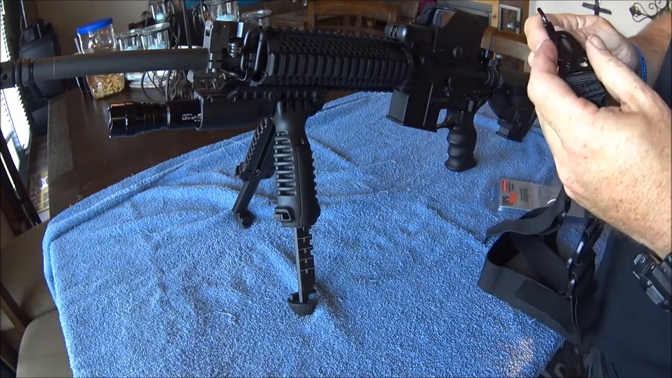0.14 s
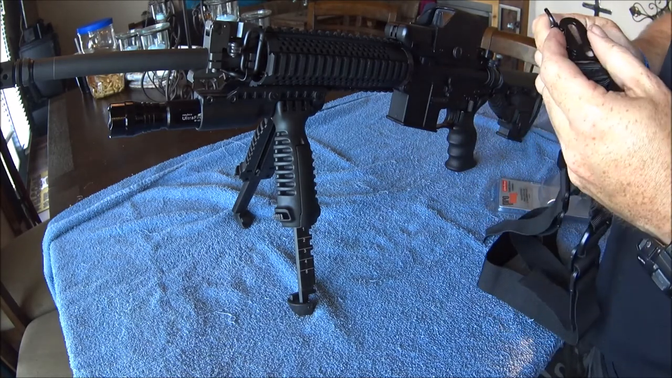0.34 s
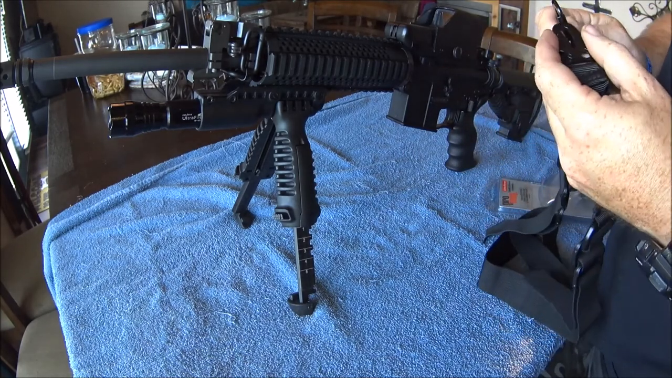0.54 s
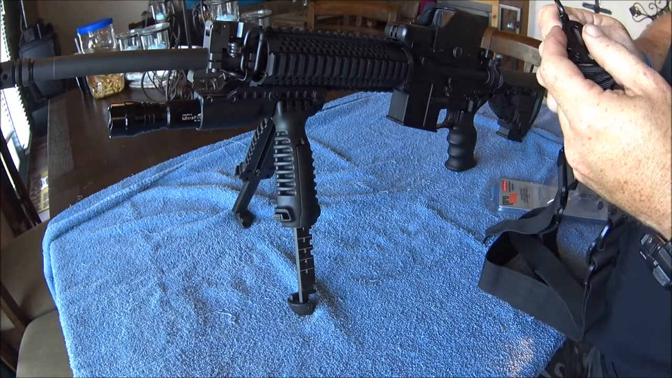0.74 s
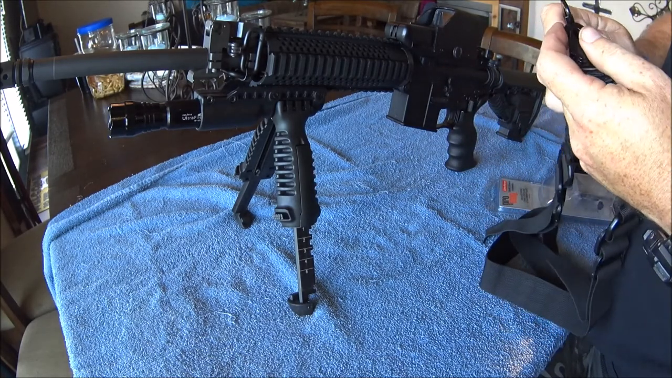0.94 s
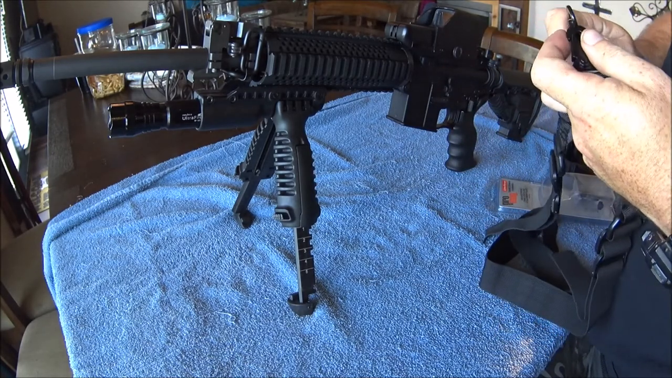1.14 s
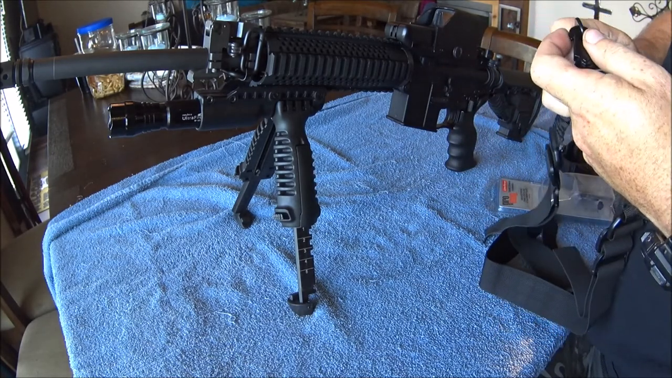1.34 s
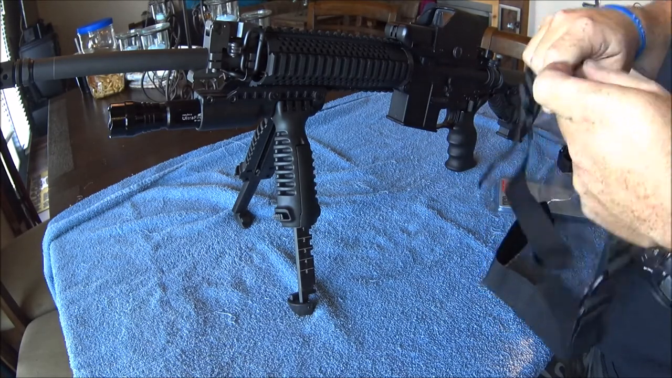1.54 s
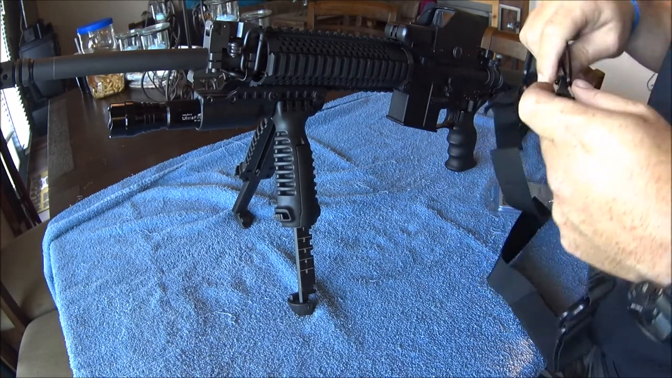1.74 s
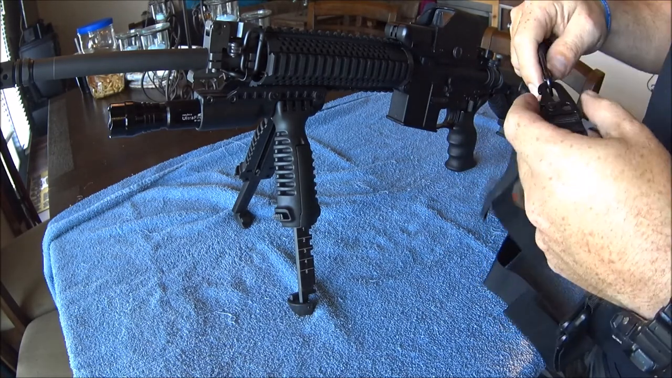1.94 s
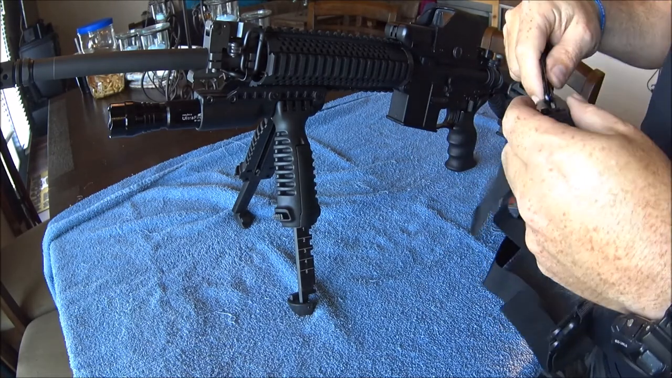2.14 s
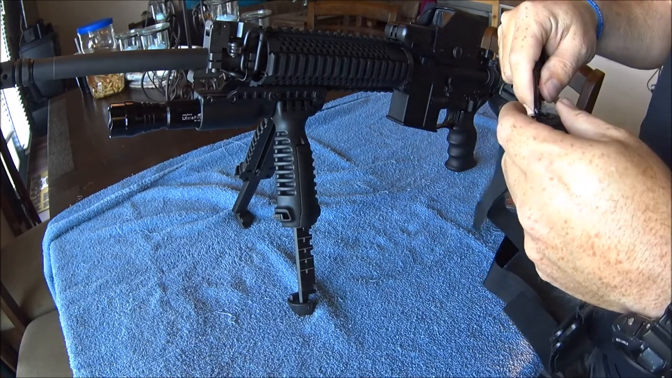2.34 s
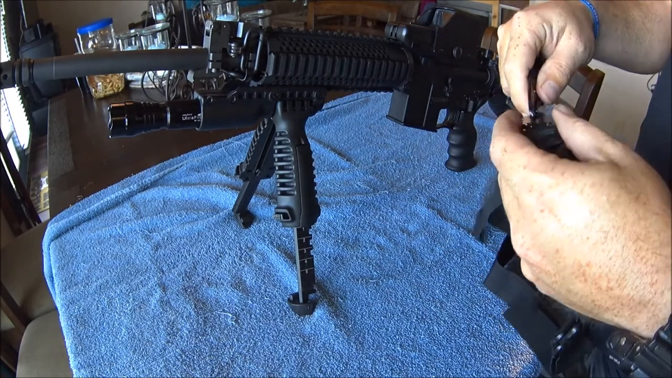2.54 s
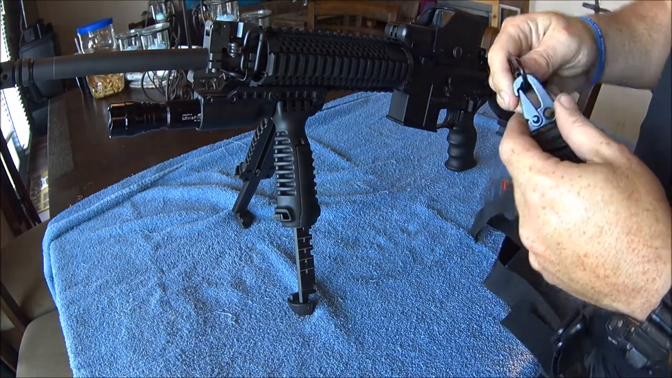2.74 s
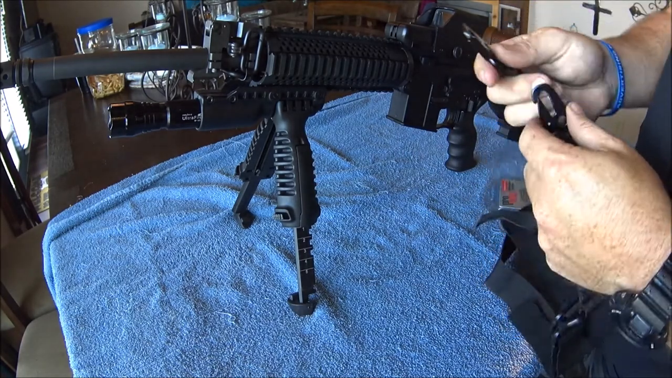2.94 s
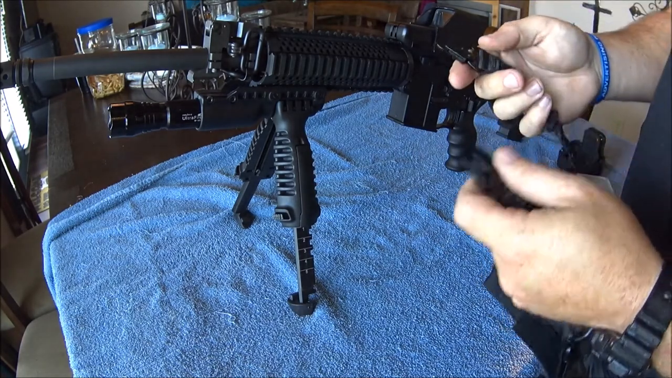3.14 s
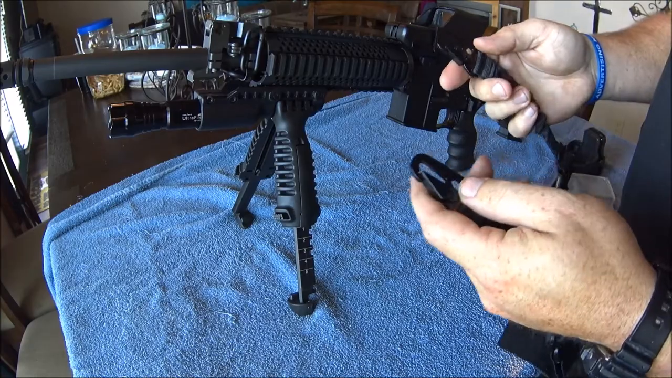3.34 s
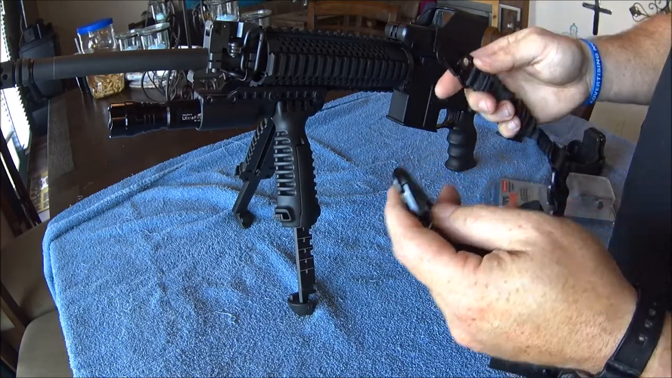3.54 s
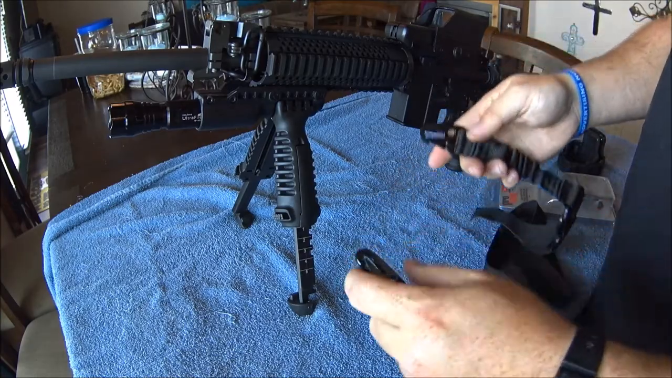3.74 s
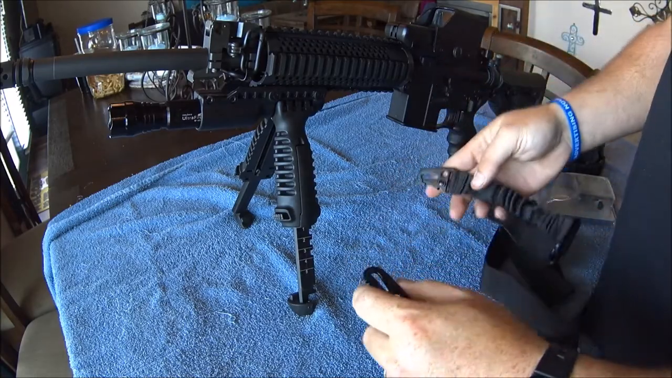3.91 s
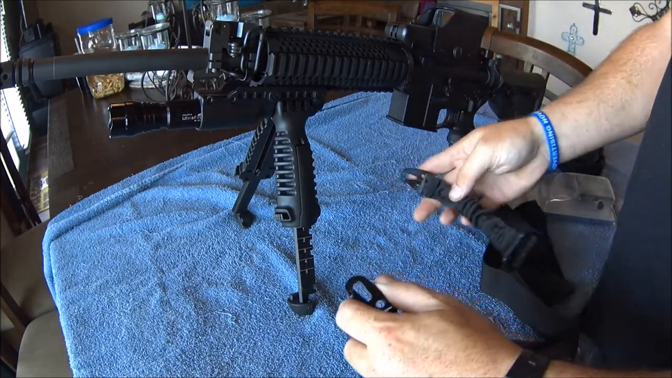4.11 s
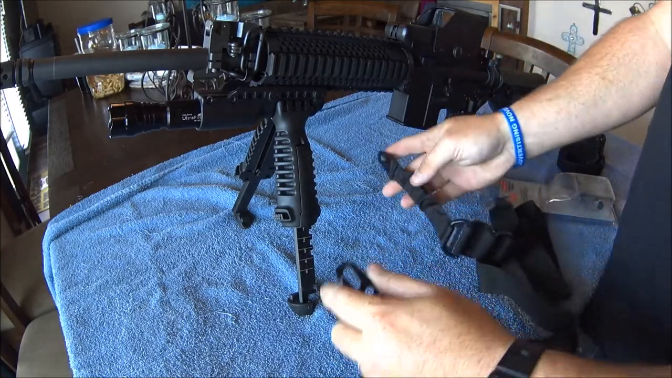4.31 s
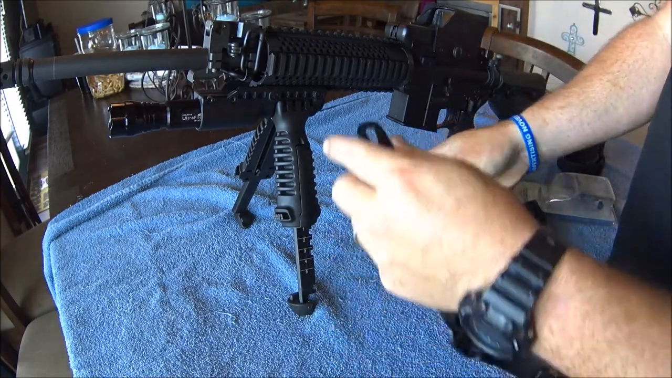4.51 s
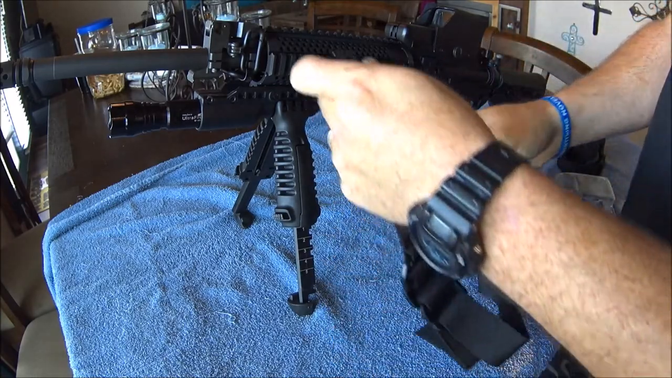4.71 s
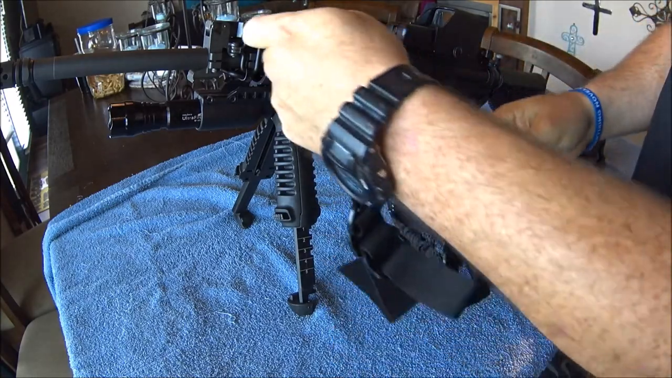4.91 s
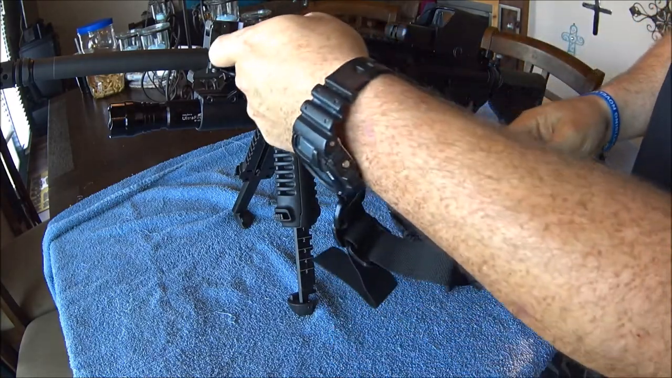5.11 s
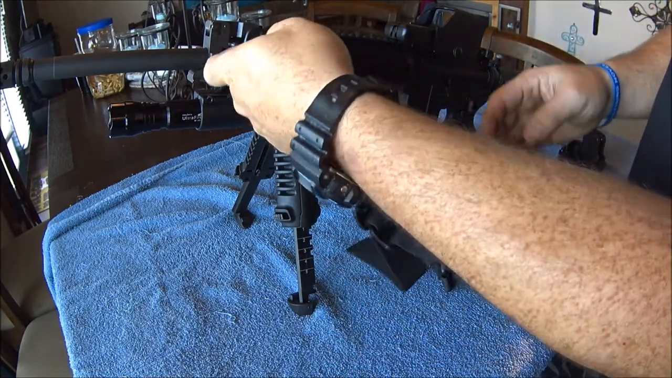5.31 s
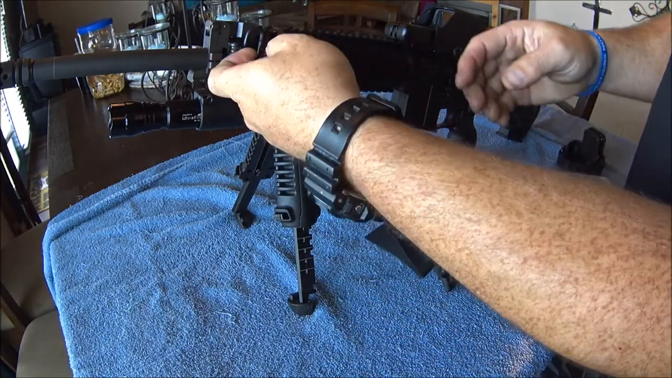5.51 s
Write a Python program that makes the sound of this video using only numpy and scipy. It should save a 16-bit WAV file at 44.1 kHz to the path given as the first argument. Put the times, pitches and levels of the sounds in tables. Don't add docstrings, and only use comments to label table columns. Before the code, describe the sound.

In a quiet indoor room, hands work spring hooks on a webbing strap. Crisp metallic clicks come first, the sharpest around 1.3 seconds, then loud rattling snaps near 2.7. Strap rubbing follows, with a soft thud on a towel, and two hard knocks on a metal frame close the scene. A small stereo microphone sits close, slightly right-weighted, with gentle hiss.

```python
import sys
import numpy as np
from scipy import signal
from scipy.fft import rfft, irfft, next_fast_len
from scipy.io import wavfile

SR = 44100
rng = np.random.default_rng(int(sys.argv[2]) if len(sys.argv) > 2 else 0)


def how_loud(loudness_db):
    steps = np.asarray(loudness_db, float) / 20
    return 10 ** steps


def store_wav(level_fs):
    pcm = np.round(np.clip(np.atleast_2d(level_fs), -1, 1) * 32767)
    wavfile.write(sys.argv[1], SR, pcm.T.astype(np.int16))


N = 245457

# frequency in Hz, level in dB, T60 in seconds.
GATE_MODES = [(5380, -14, 0.0055), (5970, -2.5, 0.0021), (6400, 1, 0.0045), (7760, 8.5, 0.004),
              (8810, -7, 0.013), (9600, -9, 0.002)]
# frequency in Hz, level in dB, T60 in seconds.
TIP_MODES = [(10900, -2.5, 0.0088), (11900, -20.5, 0.0014), (12460, -5.5, 0.0089), (14240, 5.5, 0.0073),
             (14720, -8, 0.0063)]
# frequency in Hz, level in dB, T60 in seconds.
BODY_MODES = [(1380, -6, 0.0012), (2050, -6.5, 0.0067), (2597, -13, 0.022), (3720, 2, 0.0033),
              (4540, -13, .006)]
GRIP_DB, GRIP_T60_S = -2.1, 0.0098
FOCUS_DB, DULL_FOCUS = 1.5, 1.5
HOOK_ASIDE = (0.57, 0.55)


def hooks():
    out = np.zeros((2, N))
    for s, gate_db, body_db, tip_db, free_hz, ms in clicks():
        focus_db = FOCUS_DB + DULL_FOCUS * max(body_db - gate_db, 0)
        body = [(hz, db - focus_db * abs(np.log2(hz / free_hz)), t60) for hz, db, t60 in BODY_MODES]
        body.append((free_hz, GRIP_DB, GRIP_T60_S))
        blow(out, s, gate_db, GATE_MODES, ms, 4700, HOOK_ASIDE)
        blow(out, s, body_db, body, ms, 1150, HOOK_ASIDE)
        blow(out, s, tip_db, TIP_MODES, ms, 9500, HOOK_ASIDE)
    return out


# start in seconds, gate level in dB, body level in dB, tip level in dB, chatter in ms.
NECK_SNAPS = [
    (0.225, -24.5, -32.5, -39, 1.04),
    (0.2467, -45, -51, -61, 1.8),
    (0.3976, -36.5, -54, -44, 0.66),
    (0.5724, -25.5, -29, -27.5, 0.95),
    (1.3087, -24.5, -31.5, -52, 0.53),
]
# start in seconds, gate level in dB, body level in dB, tip level in dB, chatter in ms.
RING_SNAPS = [
    (0.4911, -23, -35.5, -35, 0.85),
    (1.2972, -53, -48, -60, 0.6),
    (1.3443, -10, -22, -16.5, 1),
    (2.6832, -10.5, -19.5, -13, 5.5),
    (2.7395, -29.5, -32, -39, 0.75),
    (2.835, -14, -24.5, -8.5, 6.5),
    (2.841, -15, -25, -12, 1.65),
    (2.8525, -11.5, -22, -10.5, 1.7),
]
NECK_HZ, RING_HZ = 2430, 3440
# start in seconds, body level in dB, gate level in dB, body pitch in Hz, chatter in ms.
TOUCHES = [(0.4211, -45, -46.5, 2660, 6.6), (0.4284, -46, -44, 2320, 1.3),
           (0.7114, -45.5, -48.5, 2500, 0.48), (1.2025, -37, -43, 2452, 4),
           (1.2083, -38.5, -43, 2400, 0.91), (1.5066, -32.5, -35, 4930, 0.61),
           (1.6028, -51, -45.5, 1550, 1.8), (1.6251, -42.5, -45, 2600, 1.3),
           (1.6988, -44.5, -49, 3900, 2.0), (1.965, -41.5, -42, 1990, 4.3), (2.2153, -47.5, -53, 2400, 1.8),
           (2.765, -42.5, -49.5, 2100, 2.0), (2.8279, -35, -42, 1890, 8.3), (2.866, -37.5, -50, 4150, 2.0),
           (2.887, -37.5, -50, 4050, 1.7), (3.8951, -44.5, -59, 2880, 1.7), (4.2085, -53, -61, 2070, 2.2),
           (4.2401, -37.5, -41, 2310, 8.9), (4.4677, -45, -50, 1900, 2.7), (4.5942, -38, -54, 3260, 1.8),
           (4.6091, -41.5, -49, 1880, 2.1), (4.65, -49, -53, 3990, 3.5), (4.7784, -30.5, -47, 2606, 1.66)]


def clicks():
    rows = []
    for snaps, hz in ((NECK_SNAPS, NECK_HZ), (RING_SNAPS, RING_HZ)):
        rows += [(s, gate, body, tip, hz, ms) for s, gate, body, tip, ms in snaps]
    for s, body, gate, hz, ms in TOUCHES:
        rows.append((s, gate, body, gate - 11, hz, ms))
    return sorted(rows)


# start in seconds, peak in dB, contact in ms, struck place from 0 to 1.
KNOCKS = [
    (5.094, -18.5, 2.22, 0.07),
    (5.155, -41, 7.5, 0.6),
    (5.3586, -15.5, 3.61, 0.93),
]
# frequency in Hz, dB struck at place 0, dB at place 1, T60 in seconds.
FRAME_MODES = [(519, -14, -11.5, 0.056), (943, -16, -17, 0.039), (1454, 1, -0.5, 0.013),
               (1615, -1, 9.5, 0.008), (1770, -13, -8.5, 0.064), (2400, -12, -5, 0.017),
               (3090, -2.5, 2, 0.0068), (3680, -5, -16, 0.019), (4220, -6, -29.5, 0.021),
               (4790, -8.5, -7.5, 0.011), (6720, -16.5, -17, 0.015)]
FRAME_ASIDE = (-0.39, 0.74)


def knocks():
    out = np.zeros((2, N))
    for s, db, ms, place in KNOCKS:
        modes = [(hz, first + place * (second - first), t60) for hz, first, second, t60 in FRAME_MODES]
        blow(out, s, db, modes, ms, 353, FRAME_ASIDE, rise=0.523)
    return out


# start in seconds, peak in dB.
THUDS = [
    (4.528, -40.5),
    (4.5397, -45),
    (4.5545, -45.5),
    (4.584, -49),
]
# frequency in Hz, level in dB, T60 in seconds.
TABLE_MODES = [(133, -10, 0.052), (188, -26, .14), (258, 4.5, 0.05), (323.6, 2.5, 0.14), (430, 7, 0.033),
               (618, -8, 0.089), (706, -1.5, 0.051)]


def thuds():
    out = np.zeros((2, N))
    push = np.exp(-(np.arange(BURST) / SR / 0.00016 - 2) ** 2)
    for s, db in THUDS:
        table = np.sum(ring(TABLE_MODES, 2.2, size=9000), axis=0)
        thud = thin(np.convolve(push, table), 130)
        add(out, s, db, np.array([thud, thud]))
    return out


# frequency in Hz, level in dB.
WEAVE = [(850, -34.5), (1200, -4), (2000, -0.5), (2900, -4), (3800, -1), (5000, -6.5)]
# frequency in Hz, level in dB.
SOFT_TOP = [(15700, 0), (15950, -40), (16100, -80)]
JERK = 200


def strap():
    jerks_db = 2.8 * np.repeat(rng.standard_normal(N // JERK + 1), JERK)[:N]
    slips_db = 2.34 * rng.exponential(size=N)
    ticks = colour(rng.standard_normal(N) * how_loud(jerks_db + slips_db), SOFT_TOP)
    coarse = colour(ticks, WEAVE, [(5000, -2.0), (6200, -28.0)])
    fine = colour(ticks, [(4400, -30), (5400, 1.5), (7500, 9.0), (9500, -5.5), (11000, -37.5)])
    bright = colour(ticks, [(9000, -23), (10500, 2.0), (12000, -10.5), (14000, -1.5), (15700, -6.5)])
    cloth = colour(ticks, [(250, -19), (450, 3), (1000, 2.5), (1400, -33)])
    return sum(gain * unit(layer) for gain, layer in zip(pull(), (coarse, fine, bright, cloth)))


# start in seconds, hold in
# seconds, level in dB, fine edge in dB, cloth in dB.
RUBS = [
    (1.45, 0.14, -66.5, -4, -5),
    (1.641, 0.0046, -57, -8, -12),
    (1.735, .02, -68.5, 0, 0),
    (1.775, 0.011, -61.5, -.6, -10),
    (1.88, 0.0091, -66.5, -1, -8),
    (1.985, .005, -58, 2, -4),
    (1.999, .025, -57, -7.5, -5),
    (2.225, .01, -65.5, -11, -1.5),
    (2.58, 0.035, -73, 0, -14),
        (3.06, .01, -56, -5, -13), (3.1, .05, -63.5, -3.5, -25), (3.2, 0.022, -54.5, -9, -24),
          (3.235, 0.0067, -53, -6.5, -27), (3.46, 0.042, -61, -6, -6.5), (3.6, 0.0066, -61, -14, -7.5),
          (4.0, .01, -61.5, -11, -28), (4.05, 0.027, -62.5, -2.5, -20), (4.185, 0.0033, -57.5, -4, -20),
          (4.225, 0.013, -51.5, -8, -13), (4.28, 0.035, -62, -18, -21), (4.38, 0.069, -59, -10, -11),
          (4.47, 0.021, -65.5, -3, -12), (4.581, .005, -56, -12, -11), (4.65, 0.042, -68.5, -2, -15),
          (3.68, .02, -72.5, 1, -17), (4.33, 0.018, -66, -0.5, -15), (4.81, 0.016, -74.5, 7.5, -13),
          (4.84, 0.19, -68.5, -16, -4)]
RUB_RISE_DB_S, RUB_FALL_DB_S, RUB_BRIGHT_DB, BRIGHT_PER_FINE = 367, 295, -14, 0.35
# start in seconds, hold in seconds, level in dB,
# bright edge in dB.
BUZZES = [
    (0.0, 0.017, -65.5, -0.5),
    (1.41, .03, -69, -3),
    (2.706, 0.035, -53.5, 0),
    (2.859, 0.035, -54.5, 1.5),
]
BUZZ_RISE_DB_S, BUZZ_FALL_DB_S, BUZZ_FINE_DB, BUZZ_CLOTH_DB = 697, 92.5, 3.5, -22
# time in seconds, level in dB.
FIDGET = [(0.1, -89), (0.21, -70), (0.7, -72.5), (1.34, -78.5), (1.6, -70), (2.3, -72.5), (2.5, -76),
          (3.3, -71), (3.41, -70), (3.8, -72), (4.1, -69.5), (5.07, -70.5), (5.56, -72)]
FIDGET_EDGES_DB = -5.5, -10.5, -8


def pull():
    t = np.arange(0, N + 64, 64) / SR
    strokes = []
    for s, hold, db, fine, cloth in RUBS:
        bright = RUB_BRIGHT_DB + BRIGHT_PER_FINE * fine
        strokes.append((s, hold, db, RUB_RISE_DB_S, RUB_FALL_DB_S, fine, bright, cloth))
    for s, hold, db, bright in BUZZES:
        strokes.append((s, hold, db, BUZZ_RISE_DB_S, BUZZ_FALL_DB_S, BUZZ_FINE_DB, bright, BUZZ_CLOTH_DB))
    fidget_db = np.interp(t, *np.transpose(FIDGET))
    power = how_loud(fidget_db + np.array([0, *FIDGET_EDGES_DB])[:, None]) ** 2
    for s, hold, db, rise, fall, *edges_db in strokes:
        shape_db = db - rise * np.maximum(s - t, 0) - fall * np.maximum(t - s - hold, 0)
        power = power + how_loud(shape_db + np.array([0, *edges_db])[:, None]) ** 2
    return [np.interp(np.arange(N) / SR, t, row) for row in np.sqrt(power)]


# start in seconds, hold in seconds, level in dB, frequency in Hz.
SLIDES = [
    (1.966, .03, -54.5, 3930),
    (1.966, 0.018, -61, 7500),
    (1.966, .075, -56, 1840),
    (2.219, 0.027, -65, 2100),
    (3.21, .04, -64, 3400),
    (3.579, 0.033, -64.5, 3900),
    (4.27, .04, -62, 3000),
    (4.38, .05, -67, 4000),
]
SLIDE_RISE_DB_S, SLIDE_FALL_DB_S, SLIDE_WIDTH = 5000, 452, 1.21


def slides():
    t = np.arange(SR // 4) / SR - .02
    out = np.zeros(N + SR)
    for s, hold, db, hz in SLIDES:
        ticks = rng.standard_normal(len(t)) * how_loud(3.6 * rng.exponential(size=len(t)))
        near, far = SLIDE_WIDTH, SLIDE_WIDTH ** 5
        mode = [(hz / far, -55), (hz / near, -4), (hz, 0), (hz * near, -4), (hz * far, -55)]
        hum = unit(colour(ticks, mode, SOFT_TOP))
        shape_db = db - SLIDE_RISE_DB_S * np.maximum(-t, 0) - SLIDE_FALL_DB_S * np.maximum(t - hold, 0)
        i = int((s + t[0]) * SR)
        out[i:i + len(t)] += hum * how_loud(shape_db)
    return out[:N]


# start in seconds, frequency in Hz, peak in dB, T60 in seconds.
SINGING = [(0.225, 8200, -36, 0.094), (0.492, 13600, -38, .1), (1.3445, 6900, -19, 0.016),
           (2.684, 6300, -22.5, .03), (2.835, 5900, -20, 0.035), (2.684, 8000, -32, 0.332),
           (2.685, 3450, -40, 0.37), (2.838, 14200, -28, 0.4), (5.096, 4450, -46, 0.58),
           (5.095, 1790, -40, 0.23), (5.13, 500, -48.5, .15), (5.36, 1900, -47.5, 0.29),
           (5.36, 1050, -45, 0.42), (5.4, 3000, -51, .3), (5.095, 3300, -50, .3), (1.37, 4500, -41, .2),
           (0.004, 13700, -49, .3), (5.36, 1440, -31, 0.035), (5.362, 2450, -42, 0.33)]
SING_SPREAD, SING_ASIDE_DB = .026, 5


def singing():
    out = np.zeros((2, N))
    for s, hz, db, t60 in SINGING:
        cluster = [(hz * (1 + SING_SPREAD * off), 0, t60) for off in rng.standard_normal(16)]
        sound = thin(np.sum(ring(cluster, 3.0, size=12000), axis=0), hz / 2)
        add(out, s, db, sound * how_loud([[0], [SING_ASIDE_DB]]))
    return out


# frequency in Hz, lead of the left in radians.
PORT_PHASE = [(300, -0.3), (1700, 0.8), (3450, -0.018), (4500, 0), (7600, -0.53), (12000, -0.16),
              (16000, 0)]
# frequency in Hz, left minus right in dB.
PORT_LEAN = [(500, -3), (1500, -.6), (3500, 1.3), (8000, 2.1), (13000, -0.9)]


def ports(x):
    size = next_fast_len(N)
    hz = np.arange(size // 2 + 1) * SR / size
    turn = np.exp(.5j * curve(PORT_PHASE, hz)) * how_loud(curve(PORT_LEAN, hz) / 2)
    return irfft(rfft(x, size) * np.array([turn, 1 / turn]), size)[:, :N]


# frequency in Hz, T60 in seconds.
ROOM_T60 = [(300, 0.96), (1500, 0.59), (4000, 0.4), (8000, 0.18), (15000, 0.48)]
# frequency in Hz, level in dB.
ROOM_COLOUR = [(300, 0.5), (1450, -4.5), (1950, 0.5), (2450, -2.5), (4000, 2), (8000, -8.5), (12000, -4.5),
               (15200, -15)]
ROOM_DB, ROOM_LIKENESS = -7.5, 0.84


def room(x):
    t = np.arange(SR // 2) / SR
    tail = 0
    for hz in 100 * 2 ** np.arange(0, 7.5, .5):
        band = [(hz / 1.6, -40), (hz / 1.15, 0), (hz * 1.15, 0), (hz * 1.6, -40)]
        echoes = colour(rng.standard_normal((2, len(t))), band)
        tail = tail + echoes * how_loud(-60 * t / curve(ROOM_T60, hz))
    tail = tail * (1 - np.exp(-t / 0.00041))
    tail = tail * (1 + 2.2 * np.exp(-t / 0.0067))
    widths = np.sqrt([[1 + ROOM_LIKENESS], [1 - ROOM_LIKENESS]])
    mid, side = tail * widths / np.sqrt(np.sum(tail ** 2))
    x = colour(x, ROOM_COLOUR, SOFT_TOP)
    left = signal.fftconvolve(x, mid + side)[:N]
    right = signal.fftconvolve(x, mid - side)[:N]
    return how_loud(ROOM_DB) * np.array([left, right])


# frequency in Hz, level in dB.
HISS = [(18, -49.5), (30, -23.5), (52, -12.5), (203, -5), (279, -3.5), (471, -4.5), (2390, -11.5),
        (6830, -22.5), (9700, -26), (12000, -28), (13300, -23), (15800, -21.5)]
# frequency in Hz, side minus mid in dB.
HISS_SIDE = [(60, -19), (110, -9.5), (200, -5), (380, -0.5), (700, 4), (1290, 4), (2380, 1.5), (4400, 0.5),
             (8120, -10.5), (15000, -38)]
HISS_DB, HISS_LEAN_DB = -63, -0.5


def hiss():
    mid, side = colour(rng.standard_normal((2, N)), HISS, SOFT_TOP)
    side = colour(side, HISS_SIDE)
    both = np.array([mid + side, mid - side]) * lean(HISS_LEAN_DB)
    return both * how_loud(HISS_DB) / np.std(mid)


BURST = 400


def blow(out, s, db, modes, ms, low_hz, aside, rise=.02):
    both = []
    for share in (1, aside[1]):
        t = np.arange(BURST) / SR * 1000 / max(ms * share, .1)
        push = np.clip(2 - 2 * t, 0, 1) * np.clip(t / rise + 0.26, 0, 1)
        push = push * (1 + 2.96 * np.exp(-(t - rise) ** 2 / 0.0043))
        rings = ring(np.array(modes) * [1, 1, share], 1.0, size=3000)
        contacts = push * rng.standard_normal((len(modes), BURST))
        shaken = signal.fftconvolve(rings, contacts, axes=1)
        shaken = shaken * energy(rings) / energy(shaken)
        sound = thin(np.sum(shaken, axis=0), low_hz)
        both.append(sound / energy(sound))
    add(out, s, db, np.array(both) * how_loud([[0], [aside[0]]]))


def ring(modes, scatter_db, size):
    hz, db, t60 = np.transpose(modes)[:, :, None]
    pitch_chance, level_chance = rng.standard_normal((2, len(modes), 1))
    t = np.arange(size) / SR
    hz = hz * (1 + .008 * pitch_chance)
    fading_db = db + scatter_db * level_chance - 60 * t / np.maximum(t60, .002)
    return how_loud(fading_db) * np.sin(2 * np.pi * hz * t)


def thin(x, hz):
    return signal.sosfilt(signal.butter(4, hz, "high", fs=SR, output="sos"), x)


def add(out, s, db, sound):
    i = int(s * SR)
    level = how_loud(db) / np.max(np.abs(sound[0]))
    out[:, i:i + sound.shape[1]] += (level * sound)[:, :N - i]


def curve(table, hz):
    f, v = np.transpose(table)
    return np.interp(np.log(np.maximum(hz, 1)), np.log(f), v)


def colour(x, *tables):
    size = next_fast_len(x.shape[-1])
    hz = np.arange(size // 2 + 1) * SR / size
    gain = how_loud(sum(curve(table, hz) for table in tables))
    return irfft(rfft(x, size) * gain, size)[..., :x.shape[-1]]


def unit(x):
    return x / np.sqrt(np.mean(x ** 2))


def energy(x):
    return np.sqrt(np.sum(x ** 2, -1, keepdims=True))


def lean(db):
    return how_loud([[db / 2], [-db / 2]])


def scene():
    facing, aside = hooks() + knocks() + thuds() + strap()
    near, far = singing() + slides()
    handling = ports(facing + near) + room(aside) + room(far)
    return handling * lean(-2.4) + hiss()


def roll_off(x):
    return signal.sosfilt(signal.butter(12, 16710, fs=SR, output="sos"), x)


def record(dry):
    steep = signal.ellip(8, .3, 60, 16250, fs=SR, output="sos")
    mix = signal.sosfilt(steep, dry)
    return roll_off(mix)


dry = scene()
out = record(dry)
store_wav(out)
```